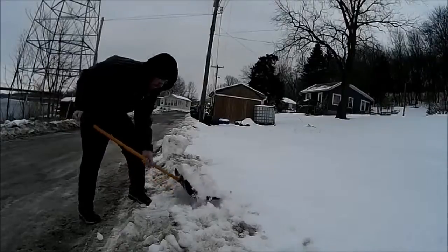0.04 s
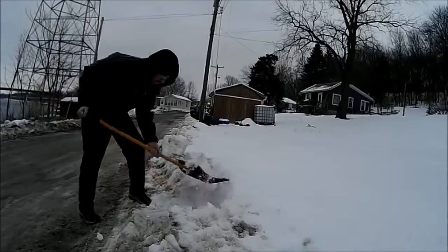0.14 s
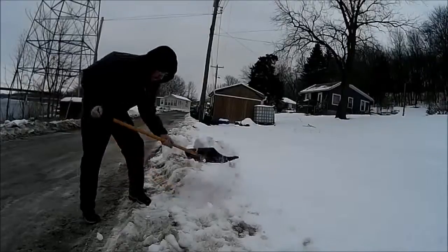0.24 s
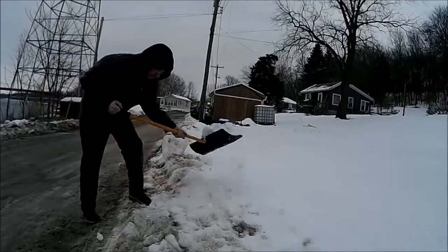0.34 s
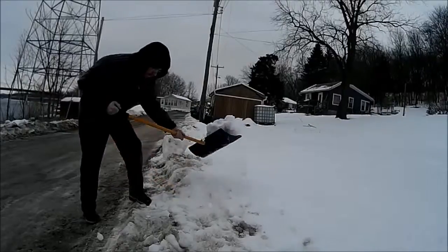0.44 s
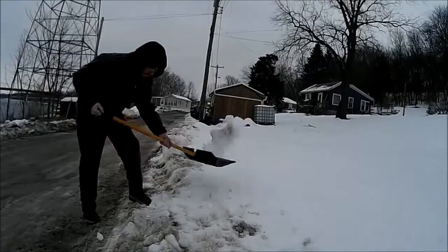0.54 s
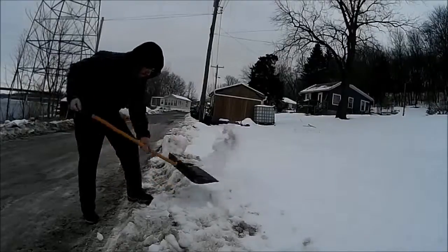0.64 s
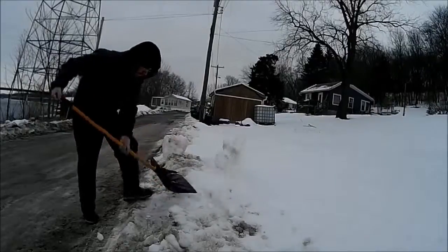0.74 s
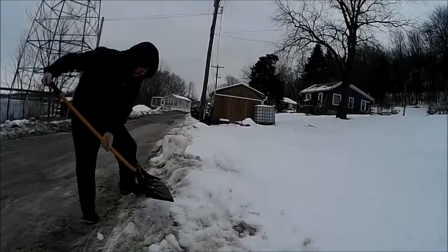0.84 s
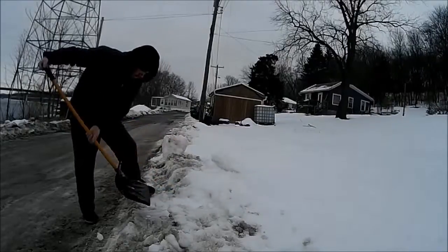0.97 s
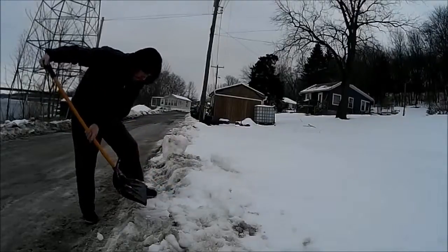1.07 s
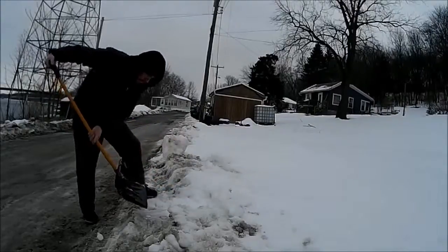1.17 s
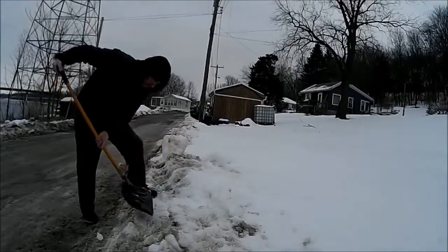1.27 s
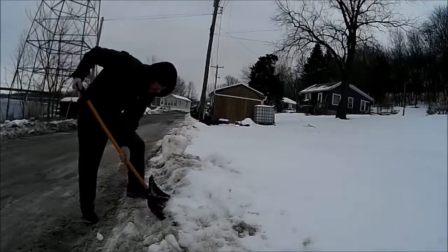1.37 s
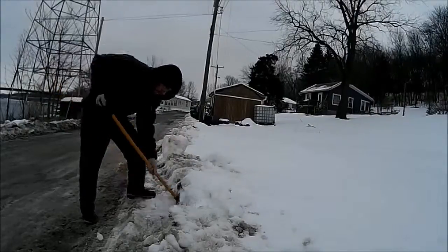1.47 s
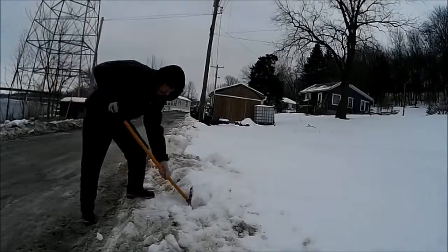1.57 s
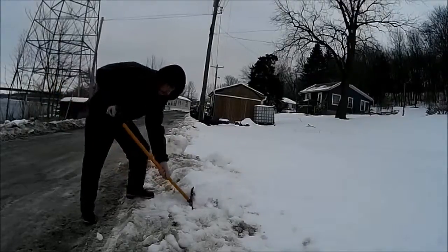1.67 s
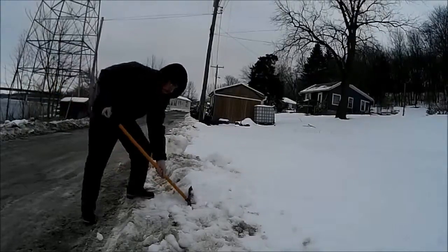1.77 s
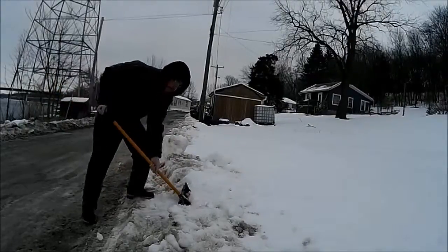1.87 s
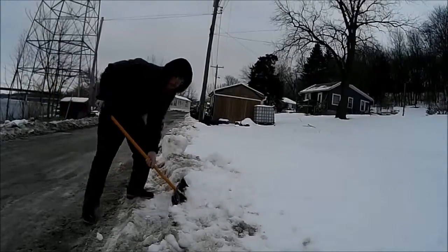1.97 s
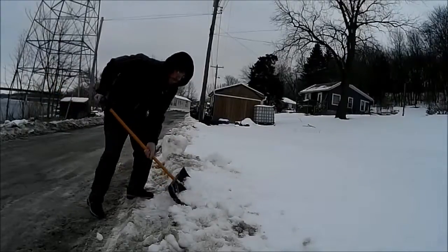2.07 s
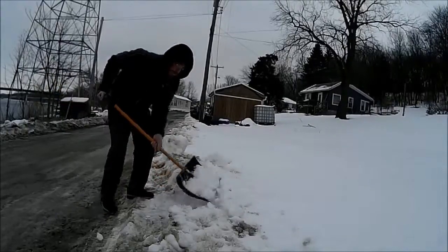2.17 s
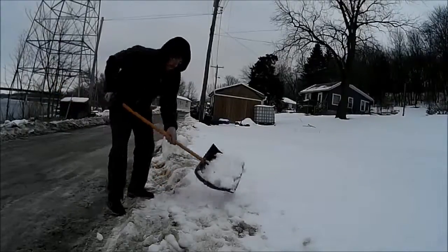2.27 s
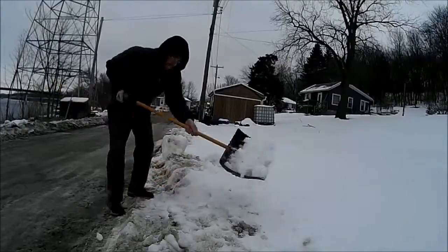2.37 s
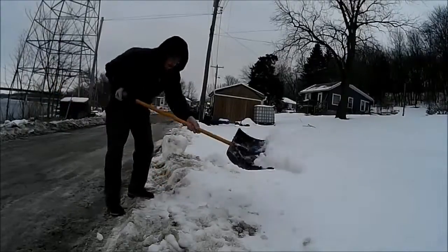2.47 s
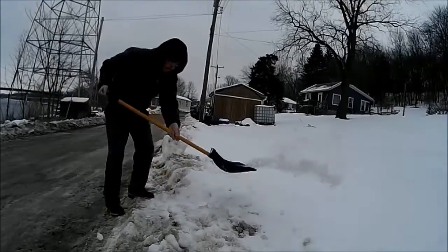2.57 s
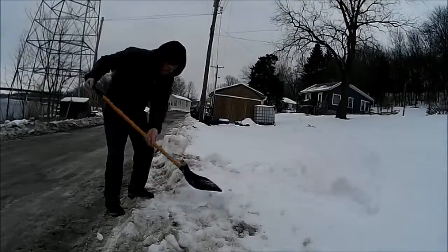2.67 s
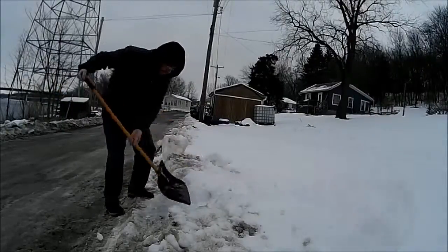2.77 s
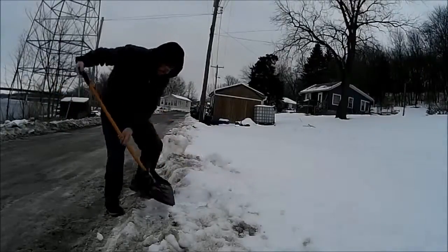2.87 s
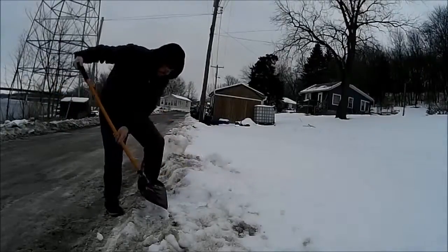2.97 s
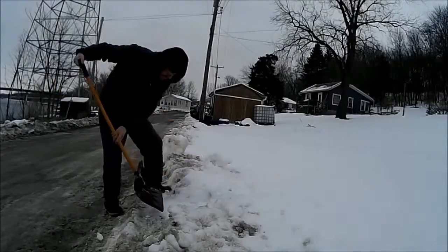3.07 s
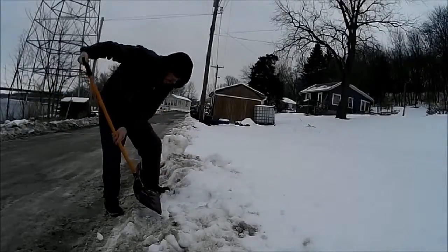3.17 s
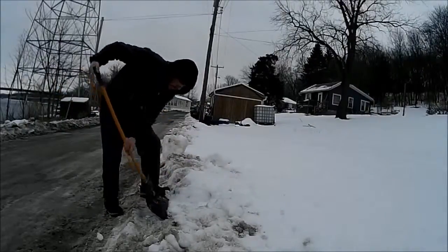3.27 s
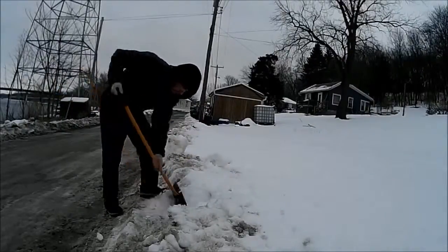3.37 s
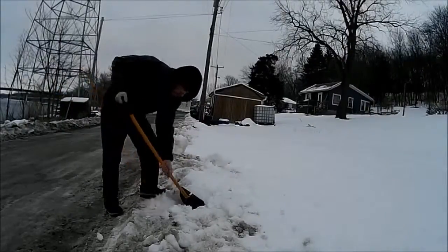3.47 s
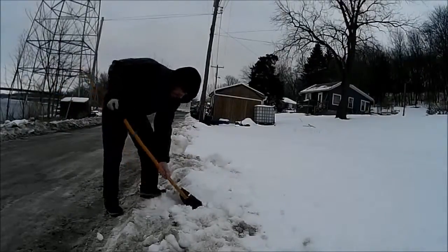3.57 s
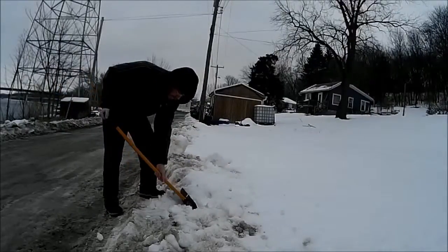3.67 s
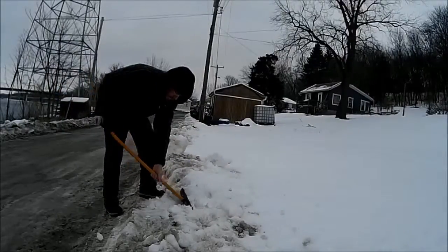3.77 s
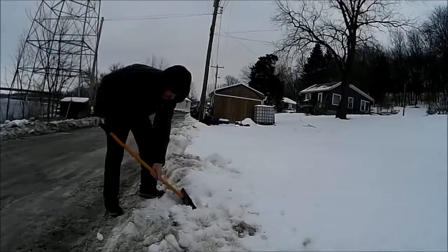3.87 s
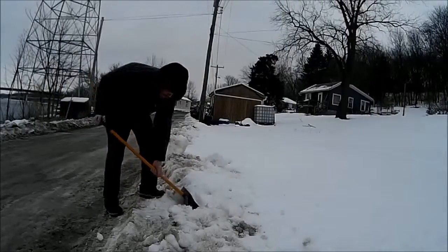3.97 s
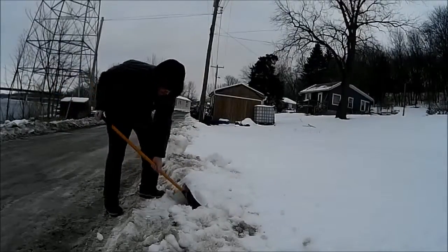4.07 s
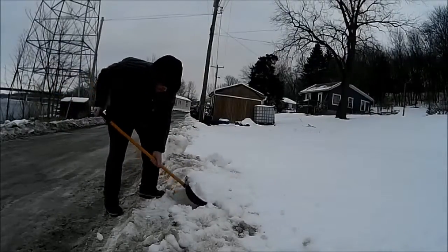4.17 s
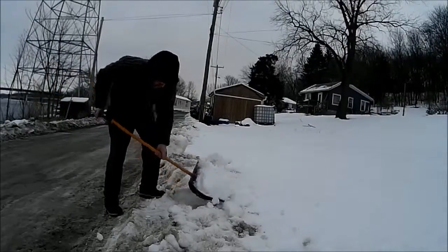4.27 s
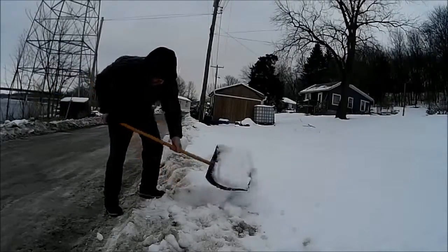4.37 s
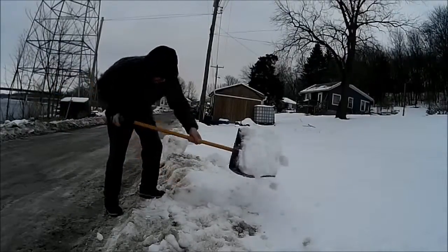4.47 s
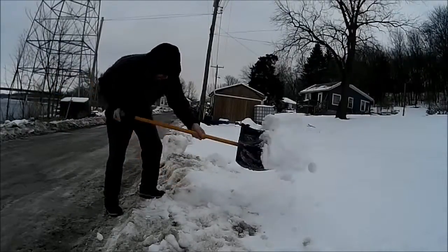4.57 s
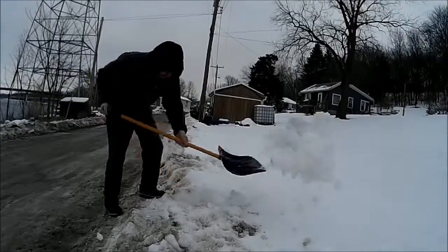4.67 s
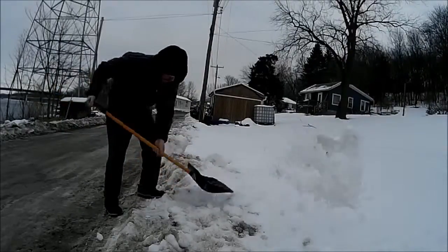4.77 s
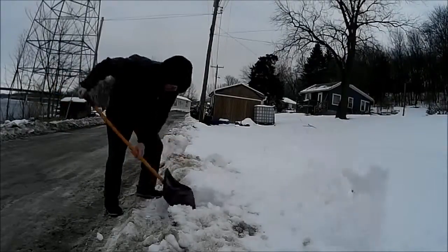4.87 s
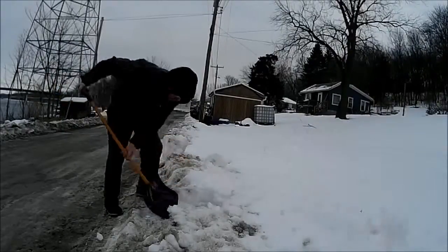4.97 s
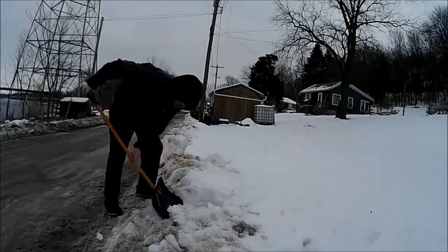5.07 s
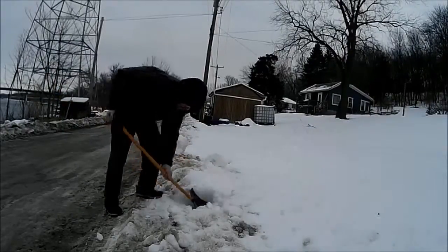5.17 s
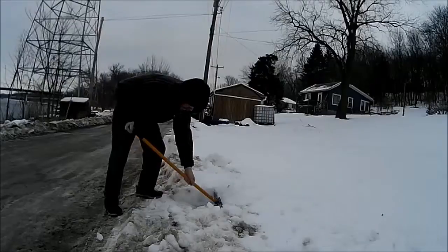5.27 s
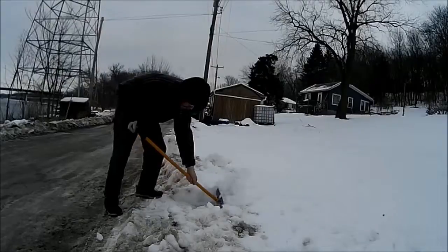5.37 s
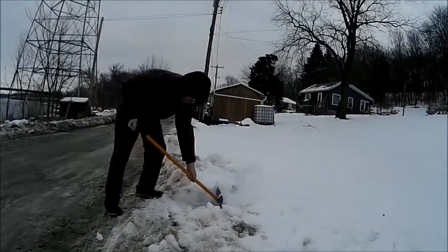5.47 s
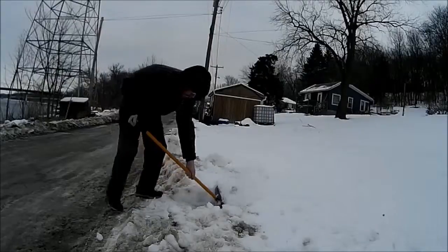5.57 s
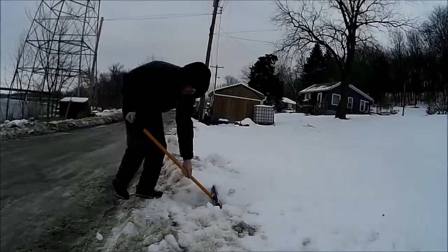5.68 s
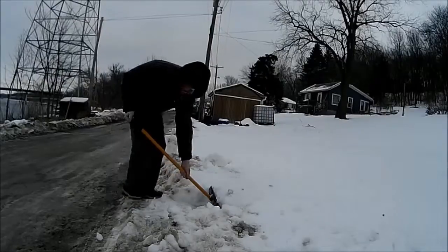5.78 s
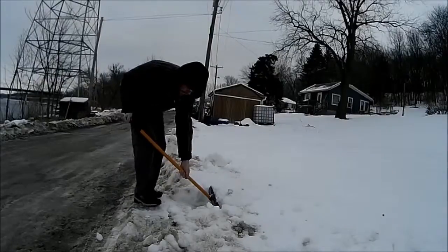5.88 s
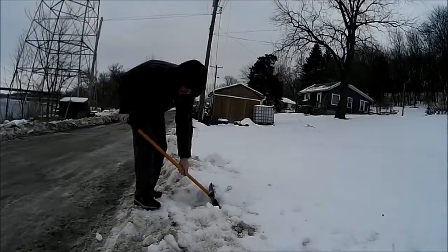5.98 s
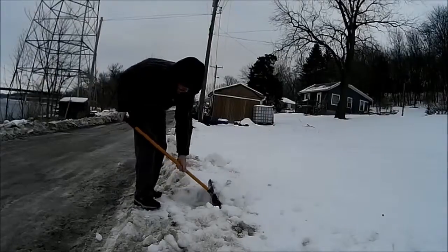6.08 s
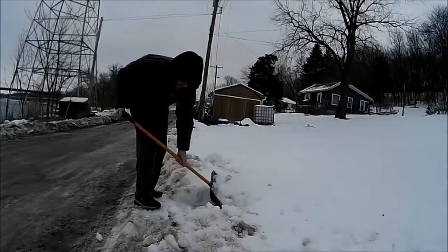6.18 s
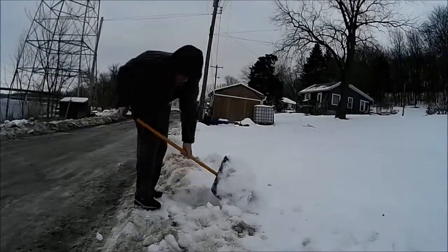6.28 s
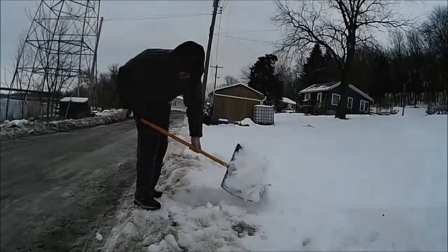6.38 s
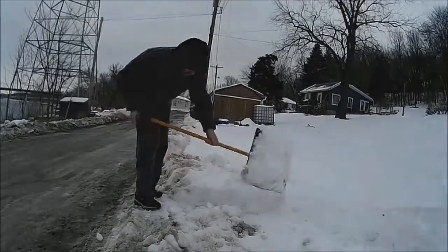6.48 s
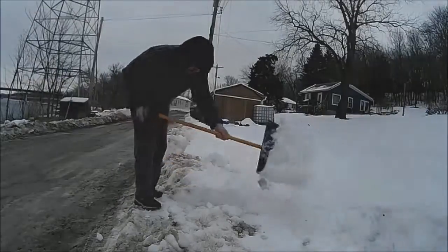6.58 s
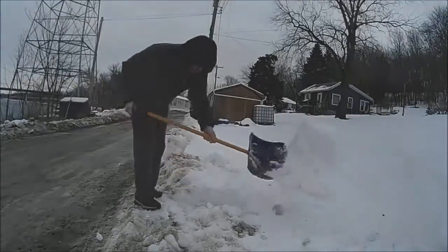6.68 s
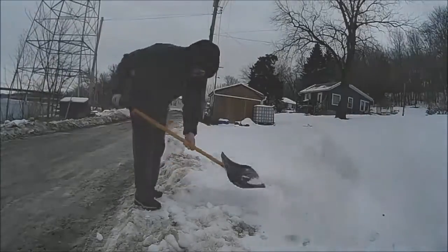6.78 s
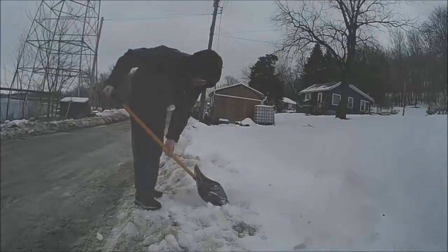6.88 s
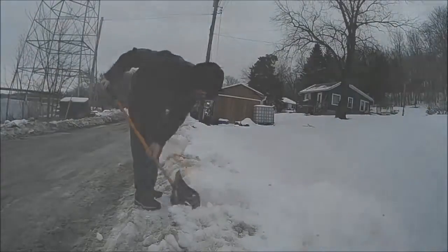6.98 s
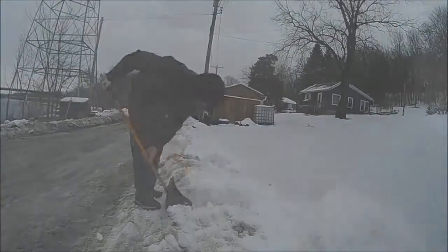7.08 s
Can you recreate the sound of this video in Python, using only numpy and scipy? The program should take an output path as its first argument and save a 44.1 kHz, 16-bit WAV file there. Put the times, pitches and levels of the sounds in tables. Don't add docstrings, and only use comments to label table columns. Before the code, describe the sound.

Over a quiet, hissy winter ambience, small lumps tick and powder hisses. Two short, crackling shovel strokes are separated by soft falling snow; a third leads straight into a sharp, metallic icy blow and skid. Then calm, before three joined scrapes erupt right beside the microphone, coarse, hollow and overloaded, with gusts rumbling until the abrupt end.

```python
import sys
import numpy as np
from scipy import signal
from scipy.io import wavfile
from scipy.ndimage import uniform_filter1d

SR = 44100
rng = np.random.default_rng(int(sys.argv[2]) if len(sys.argv) > 2 else 0)


def ratio(d):
    e = np.asarray(d, float) / 20
    return 10 ** e


def dump(signal):
    limited = np.clip(np.atleast_2d(signal).T, -1, 1)
    pcm = np.round(limited * 32767).astype(np.int16)
    wavfile.write(sys.argv[1], SR, pcm)


N = 314433
T = np.arange(N) / SR

# (centre [Hz], width [Hz], lift [dB])
FAR_RINGS = [(555, 160, 5.5), (1500, 420, 4.5), (2145, 67, 6.5), (3563, 630, 11), (3970, 180, -6.5),
             (4930, 310, -7), (5370, 310, 8), (7290, 1200, 7), (8100, 380, -7.5), (10020, 430, -9.5),
             (11130, 2300, 10), (13900, 860, -15.5), (14800, 600, -6.5)]
NEAR_RINGS = [(820, 240, 5.5), (1370, 270, 0), (2204, 82, 5), (2590, 260, 1), (3510, 770, 5),
              (4400, 220, 6.5), (5300, 220, 5), (6600, 400, 1.5), (13600, 800, -10), (14600, 700, 2)]


def evened(x):
    return x / np.sqrt(np.mean(x ** 2) + 1e-20)


def wobble(ms):
    size = max(int(ms * SR / 1000), 2)
    smooth = uniform_filter1d(rng.standard_normal(N), size)
    return evened(uniform_filter1d(smooth, size))


def grains(per_s, spread_db):
    snaps = (rng.random(N) < per_s / SR) * rng.standard_normal(N)
    size_db = spread_db * np.minimum(rng.exponential(1, N), 4)
    return evened(snaps * ratio(size_db))


def coloured(x, points, rings, lo_hz=1, hi_hz=30000):
    hz = abs(np.fft.fftfreq(8192, 1 / SR)) + 1
    f, db = np.transpose(points)
    shape_db = np.interp(np.log(hz), np.log(f), db)
    for centre, width, lift_db in rings:
        shape_db += lift_db / (1 + (2 * (hz - centre) / width) ** 2)
    edges = 1 / np.sqrt((1 + (lo_hz / hz) ** 8) * (1 + (hz / hi_hz) ** 8))
    log_gain = np.log(ratio(shape_db) * edges + 1e-6)
    phase = -signal.hilbert(log_gain).imag
    taps = np.fft.ifft(np.exp(log_gain + 1j * phase)).real[:4096]
    return signal.oaconvolve(x, taps / np.linalg.norm(taps))[:N]


def layers(crunch_db, slide_db, load_db, law):
    scoop_db, scoop_slope, grit_db, grit_slope, fizz_db = law
    flat = np.zeros(len(crunch_db))
    scoop = scoop_db + load_db + scoop_slope * (crunch_db + 38.0)
    grit = flat + grit_db + grit_slope * slide_db
    fizz = flat + fizz_db + slide_db
    return ratio(crunch_db + np.array([scoop, flat, grit, fizz])) ** 2


def move_gains(strokes, rustles, settle_db, law):
    rise_from_db, release_db_per_s = -21, 234
    settle_edge_db = -5
    power = layers(np.full(N, settle_db), settle_edge_db, 0, law)
    for s, rise, hold, db, slide_db in rustles:
        span = slice(round(s * SR), round((s + 0.8) * SR))
        t = T[span] - s
        swell_db = rise_from_db * np.maximum(1 - t / max(rise, 1e-3), 0)
        fall_db = release_db_per_s * np.maximum(t - rise - abs(hold), 0)
        power[:, span] += layers(db + swell_db - fall_db, slide_db, 0, law)
    for rows in strokes:
        s, *controls_db = np.transpose(rows)
        span = slice(int(s[0] * SR), int(s[-1] * SR))
        power[:, span] += layers(*[np.interp(T[span], s, db) for db in controls_db], law)
    return uniform_filter1d(np.sqrt(power), 40, axis=1)


def lump_gains(lumps, crunch_db, grit_db):
    size = 8000
    out, t = np.zeros((4, N + size)), np.arange(size) / SR
    onset = 1 - np.exp(-t / 0.00024)
    for s, db, bright_db, t60 in lumps:
        fall_db = -60 * t / np.clip(t60, .01, .2)
        low = db + crunch_db + fall_db
        high = db + bright_db + grit_db + 2 * fall_db
        start = round(s * SR)
        out[:, start:start + size] += ratio([low - 1.5, low, high, high - 2.5]) * onset
    return out[:, :N]


def shovel(moves, lumps, colour, rings, judder_db, lump_db):
    # (low edge [Hz], high edge [Hz])
    bands_hz = [(110, 800), (800, 2300), (2300, 6300), (6300, 30000)]
    judder = wobble(6.)
    gains = np.hypot(moves, lump_gains(lumps, lump_db - 20.0, lump_db - 8.0))
    scoop = grains(3000, 2.5) * evened(ratio(judder_db * judder + 0.49 * wobble(6.8)))
    crackle = grains(250, 1.9)
    crunch = evened(grains(8000, 0.73) + 0.074 * crackle)
    crunch = crunch * evened(ratio(judder_db * judder + 1.2 * wobble(36.0)))
    grit = grains(16000, 3.5) * evened(ratio(0.57 * judder_db * judder + 1.3 * wobble(15.0)))
    fizz = grains(24000, 1.0) * evened(ratio(1.2 * judder_db * judder + 0.67 * wobble(17.0)))
    sources = (scoop, crunch, grit, fizz)
    return sum(coloured(g * x, colour, rings, *band) for g, x, band in zip(gains, sources, bands_hz))


def far_shovel():
    # (time [s], pressure as crunch [dB], edge slide [dB], scoop load [dB])
    strokes = [
        [(1.3642, -41, 0, 3), (1.367, -37.5, 3.5, 4), (1.435, -27.5, 7, 5.5), (1.475, -27.5, 2, 5),
         (1.52, -26, 1, 4), (1.558, -28, 3, -2), (1.575, -23.5, -0.5, 5), (1.62, -24.5, -7, -12),
         (1.668, -28.5, -5, -2), (1.684, -57, 1, -5)],
        [(3.286, -40, -1, -6), (3.297, -35, 6, 0), (3.321, -29, 5, 6), (3.4, -23.5, 1.5, 3),
         (3.415, -16.5, 3, 5.5), (3.44, -20.5, 4, 1.5), (3.492, -19.5, 5, -1), (3.525, -26.5, 2.5, -1),
         (3.536, -42, -2, -7), (3.555, -48, -5, 0)],
        [(4.94, -63, 6, -6), (4.96, -53.5, 10, 8), (4.995, -48, 3, 4), (5.04, -38.5, -1, -3),
         (5.069, -35, -4.5, -10), (5.125, -38, 0.5, -3), (5.16, -28, 6.5, -6.5), (5.18, -28, -2.5, 3)],
    ]
    chop = [
        (5.18, -28, 3, 3),
        (5.19, -23, 5, 8.5),
        (5.222, -13, -0.5, 3),
        (5.274, -23.5, -1.5, 4.5),
        (5.28, -17.5, -4.5, 1),
        (5.316, -34, 4, -1),
        (5.36, -40, -2, 2),
        (5.39, -55, 1, -9.5),
    ]
    # (start [s], rise [s], hold [s], crunch [dB], edge slide [dB])
    rustles = [(0.0, 0.0013, 0.0018, -57, 5), (0.402, 0.023, 0.0011, -57, 0),
               (0.624, 0.027, 0.28, -64.5, 0), (0.675, 0.058, 0.11, -58, -9), (1.668, .01, 0.056, -54, 0),
               (1.767, 0.073, 0.16, -51.5, -3.5), (2.037, 0.04, .01, -47, -2.5),
               (2.108, 0.036, 0.21, -57, -3.5), (2.18, .01, 0.026, -63, 10.5),
               (2.411, 0.006, 0.12, -50.5, -5), (2.653, 0.0083, 0.021, -71, 7),
               (2.847, 0.018, 0.052, -55.5, 5), (2.965, 0.032, 0.08, -60.5, -1),
               (3.12, 0.026, 0.038, -64, -8), (3.552, 0.0084, 0.029, -43, 1),
               (3.65, 0.012, 0.033, -40, 2.5), (3.721, .006, 0.018, -51, 6.5),
               (3.846, 0.0051, 0.0092, -52, -7), (3.904, 0.034, 0.021, -60, 6.5),
               (4.074, 0.22, .001, -48.5, 1.5), (4.247, 0.014, 0.0026, -39, -1),
               (4.38, 0.022, 0.068, -78, 18), (4.494, 0.017, 0.041, -56.5, -1.5),
               (4.555, 0.078, .005, -49.5, -2), (4.683, 0.034, 0.13, -70, -4),
               (5.378, .011, 0.018, -54, -2), (5.49, 0.15, 0.11, -62, 1), (5.907, 0.011, 0.32, -60, 0),
               (6.1, 0.1, 0.15, -60.5, 1)]
    # (time [s], peak [dB], brightness [dB], t60 [s])
    lumps = [(1.383, -8.5, -23, 0.054), (1.418, -11, -11, 0.05), (1.568, -10, -12, 0.13),
             (2.493, -16, -23, 0.18), (3.293, -34, -13, 0.036), (3.314, -24, -4, 0.033),
             (3.409, -5, -19, 0.05), (3.564, -28, -10, 0.03), (3.622, -19.5, -14, 0.083),
             (3.667, -12.5, -21, 0.02), (3.732, -20, -9, 0.081), (4.256, -22, -19, 0.03),
             (4.271, -10, -16, 0.12), (4.298, -10, -15, 0.018), (4.997, -10, -15.5, 0.054),
             (5.015, -20, -16, .04), (5.199, -6, -18, .03), (5.155, -24, 3, 0.035),
             (5.181, -20.5, -3, 0.03), (5.188, -7, -23, 0.049), (5.21, 12, -27, 0.028),
             (5.332, -24, -17, 0.04)]
    # (frequency [Hz], density [dB per Hz])
    colour = [(35, -62), (60, -10.5), (215, -4.5), (350, -3), (479, 1.5), (763, 1.5), (1570, -1.5),
              (2340, -11), (3560, -16), (4000, -21), (5420, -16.5), (8240, -23), (11200, -28), (15250, -22),
              (15800, -40)]
    # (scoop at reference crunch [dB], scoop slope [dB per crunch dB],
    # grit [dB], grit slope [dB per slide dB], fizz [dB])
    law = (-5, -0.2635, -7.5, 0.75, -10)
    moves = move_gains(strokes + [chop], rustles, -70.5, law)
    return shovel(moves, lumps, colour, FAR_RINGS, judder_db=0.57, lump_db=-4.5)


def near_shovel():
    # (time [s], pressure as crunch [dB], edge slide [dB], scoop load [dB])
    strokes = [
        [(6.318, -10.5, -7.5, -4), (6.33, -16.5, 3.5, -7), (6.353, -9, 2, -0.5), (6.375, -11.5, 0, -5.5),
         (6.392, -18, -4, -5), (6.4, -13, -0.5, -11), (6.44, -19.5, 4.5, -3)],
        [(6.44, -22, 11, -2), (6.446, -13, 8, -1.5), (6.538, -18.5, 4.5, -3), (6.618, -17, 4, -0.5),
         (6.674, -10.5, -0.5, 2), (6.71, -24, 1.5, 1), (6.722, -23, -4, 10), (6.778, -39, 1, -1),
         (6.785, -30, 0, -9)],
        [(6.787, -22.5, -12, -8), (6.803, -31, -3, 9.5), (6.828, -23.5, -2, 2), (6.841, -17.5, -0.5, -3.5),
         (6.863, -20, 5, 10), (6.9, -15, 1.5, 1.5), (6.933, -12.5, -2.5, -0.5), (6.98, -7.5, -5.5, -6),
         (6.992, -13, -4, 2.5), (7.03, -17.5, -3, 3), (7.09, -15, -3, -1), (7.118, -19, -1, 4)],
    ]
    # (time [s], peak [dB], brightness [dB], t60 [s])
    lumps = [(6.318, -12, -16.5, 0.04), (6.339, 6, -11, 0.046), (6.398, -25.5, 10, 0.04),
             (6.446, -10.5, -9, 0.04), (6.651, 12, -13, 0.022), (6.723, 6.5, -25, 0.055),
             (6.785, -4, -11, 0.029), (6.813, -1, -21, 0.043), (6.834, 1, -14, 0.04),
             (6.869, -4, -21, 0.044), (6.918, 9.5, -19, 0.036), (6.935, 12.5, -25, 0.072),
             (6.976, 8.5, -9, 0.07), (7.085, 0, -8, 0.04), (7.121, 11, -18, 0.099)]
    # (frequency [Hz], density [dB per Hz])
    colour = [(24, -49.5), (40, -6), (120, -16.5), (255, -12.5), (442, -2), (1060, -3), (1360, 2.5),
              (2360, -6.5), (2680, -1), (3110, -13.5), (3620, -8), (5820, -25), (12500, -34), (15200, -36),
              (15800, -35)]
    # (scoop at reference crunch [dB], scoop slope [dB per crunch dB],
    # grit [dB], grit slope [dB per slide dB], fizz [dB])
    law = (-0.5, -0.0766, -5, 0.32, -9)
    moves = move_gains(strokes, [], -120., law)
    return shovel(moves, lumps, colour, NEAR_RINGS, judder_db=0.25, lump_db=0.5)


def flexing(x, depth_db):
    flex_hz, flex_s = 400., 0.026
    z = signal.stft(x, nperseg=128, noverlap=96)[2]
    wide, long = max(int(flex_hz * 128 / SR), 1), max(int(flex_s * SR / 32), 1)
    patches = rng.standard_normal(z.shape[::-1]).T
    for _ in range(2):
        patches = uniform_filter1d(patches, wide, axis=0)
        patches = uniform_filter1d(patches, long, axis=1)
    gain = evened(ratio(depth_db * evened(patches)))
    return signal.istft(z * gain, nperseg=128, noverlap=96)[1][:N]


def knocks():
    # (time [s], peak [dB], pitch [Hz], t60 [s])
    hard = [(1.424, -13.5, 552, 0.035), (1.444, -11, 1340, 0.012), (1.44, -18, 1470, 0.038),
            (1.657, -19, 1500, .03), (1.526, -11, 525, 0.016), (1.523, -21, 1500, .015),
            (4.268, -25.5, 240, 0.051), (1.571, -17, 1400, 0.017), (1.586, -20, 1060, .02),
            (1.622, -17, 540, 0.021), (3.32, -16, 1600, 0.017), (3.471, -11, 1800, 0.016),
            (3.505, -12, 530, 0.017), (3.732, -31.5, 1030, .02), (5.04, -25, 1580, .015),
            (5.073, -23, 1200, 0.018), (5.155, -16, 1600, 0.019), (5.18, -10, 1550, 0.015),
            (6.447, -4, 760, 0.019), (5.169, -14, 1400, .012), (5.333, -23, 980, 0.017),
            (5.4, -24, 970, 0.02), (6.413, -6, 640, 0.031), (6.361, -5, 850, .05), (6.466, 1, 1760, 0.015),
            (6.623, -4, 1440, 0.019), (6.684, -10, 600, 0.019), (6.816, -11, 1350, 0.016),
            (7.089, -4, 1030, 0.025), (1.463, -11.5, 540, 0.029), (1.582, -17, 1560, .035),
            (1.549, -11.5, 490, 0.017), (1.497, -10.5, 490, 0.014), (2.498, -32, 1350, 0.029),
            (3.4084, -10.5, 490, 0.037), (3.685, -27, 700, 0.018), (3.66, -22, 190, 0.019),
            (2.08, -32.5, 350, 0.022), (2.5, -42, 280, 0.024), (3.43, -19.5, 200, 0.066),
            (3.6, -32.5, 210, 0.043), (5.21, -17, 330, 0.05), (6.87, -8.5, 395, 0.065),
            (6.787, -23, 2700, .01), (4.275, -13.5, 500, 0.01), (4.297, -25, 1570, 0.017),
            (5.02, -22, 1230, 0.02), (5.089, -22, 1140, 0.023), (5.214, -8, 460, 0.03),
            (5.225, -6, 1150, .03), (5.245, -8, 1100, .025), (5.26, -5.5, 1490, 0.014),
            (6.443, -2, 1650, 0.012), (6.724, -27, 960, 0.015), (6.833, -1, 1320, 0.013)]
    # (time [s], peak [dB], pitch [Hz])
    pats = [(0.029, -42, 555), (0.201, -34.5, 610), (0.644, -36, 770), (0.681, -38, 1020),
            (0.738, -37, 1230), (0.785, -36.5, 1010), (0.81, -32.5, 1060), (1.006, -39, 890),
            (1.032, -40, 1090), (1.1, -41, 1100), (0.697, -38, 1040), (1.323, -42, 844), (1.963, -32, 590),
            (2.08, -31, 1400), (2.093, -31, 1300), (2.298, -35, 895), (2.729, -35.5, 700),
            (1.847, -41, 559.6), (1.861, -37, 1030), (1.892, -41, 1050), (1.93, -39, 1600),
            (2.053, -38, 560), (2.26, -35, 700), (2.423, -34.5, 1440), (2.43, -35, 650), (2.473, -32, 1450),
            (2.505, -35, 560), (2.866, -37, 800), (3.736, -28, 540), (3.563, -32, 1500), (3.663, -31, 1520),
            (3.664, -26, 3360), (3.697, -40, 2200), (4.996, -22, 820), (5.015, -23.5, 820),
            (4.27, -26, 2060), (2.881, -36, 805), (2.934, -29.5, 600), (3.078, -35.5, 850),
            (3.779, -28, 536.4), (4.231, -33, 1500)]
    pat_t60_s, rise_s, size = .013, 0.00093, 3000
    out, t = np.zeros(N + size), np.arange(size) / SR
    for s, db, hz, t60 in hard + [(*pat, pat_t60_s) for pat in pats]:
        overtone = 0.29 * np.sin(2 * np.pi * 3.2 * hz * t) * ratio(-60 * t / 0.0081)
        ring = np.sin(2 * np.pi * hz * t) + overtone
        decay = ratio(-60 * t / np.clip(t60, .006, .05)) * np.minimum(t / rise_s, 1)
        start = round(s * SR)
        out[start:start + size] += ratio(db) * ring * decay
    high_pass = signal.butter(2, 220, "high", fs=SR, output="sos")
    return signal.sosfilt(high_pass, out[:N])


def ticks(table, rings):
    size = 1200
    out, t = np.zeros(N + size), np.arange(size) / SR
    for (s, db, hz, t60), noise in zip(table, rng.standard_normal((len(table), size))):
        band = signal.butter(1, [hz / 1.6, min(hz * 1.6, 20000)], "band", fs=SR, output="sos")
        decay = ratio(db - 60 * t / np.clip(t60, .003, .05)) * np.minimum(t / 0.00069, 1)
        start = round(s * SR)
        out[start:start + size] += decay * signal.sosfilt(band, noise)
    return coloured(out[:N], [(800, -46.0), (3000, 7.0), (16000, 1.0)], rings)


def cracking_ice():
    # (time [s], peak [dB], centre [Hz], t60 [s])
    far = [(.011, -39, 8900, 0.0089), (.0707, -43, 10000, 0.0084), (.432, -54, 9000, .007),
           (.464, -54, 9000, .007), (.533, -47, 9000, .007), (.561, -48, 8990, .007),
           (1.383, -21, 9000, 0.0086), (1.417, -14, 8100, 0.013), (1.527, -26, 9000, .008),
           (1.588, -31, 9000, .008), (1.714, -45, 9000, .007), (1.95, -44, 5400, 0.033),
           (2.078, -40, 5000, .01), (2.157, -44, 8000, .007), (2.257, -43, 7000, 0.027),
           (2.298, -47, 8000, .007), (2.533, -41, 10500, 0.0087), (3.295, -25, 11500, .012),
           (3.314, -17, 9050, 0.013), (3.487, -16, 4000, .008), (3.542, -45, 12000, .006),
           (3.582, -35, 4500, .01), (3.69, -33, 3600, 0.03), (3.739, -33, 8000, .008),
           (3.857, -51, 6000, .04), (3.943, -44, 8000, .008), (4.14, -43, 4000, 0.0088),
           (4.215, -45, 4000, .01), (4.295, -35, 12000, .01), (4.351, -43.5, 7000, .02),
           (4.424, -52, 7500, .02), (4.453, -49, 7500, .015), (4.655, -42, 9000, 0.042),
           (4.679, -45, 10000, .008), (4.744, -49, 10500, .02), (4.796, -47, 9000, .007),
           (4.832, -47, 7000, .008), (4.945, -53, 9000, .008), (4.989, -33, 9000, 0.011),
           (4.995, -32, 8000, .01), (5.017, -32, 10000, 0.013), (5.052, -27, 9000, .008),
           (5.0737, -14, 8900, 0.007), (5.122, -25, 11000, .015), (5.133, -25, 4000, 0.0068),
           (5.248, -22, 6500, .008)]
    near = [(6.318, -13, 4000, 0.0069), (6.356, -6, 3500, 0.0093), (6.488, -6, 3500, 0.014),
            (6.509, -12, 3800, .01), (6.672, 0, 7900, 0.007), (6.786, -25, 5000, 0.016),
            (6.811, -22, 11000, .012), (6.928, -9, 11000, .01), (6.953, -6, 11000, .012),
            (6.984, -22, 13000, .008), (7.02, -14, 12800, .01), (7.1224, -7, 7000, 0.01)]
    return ticks(far, FAR_RINGS) + ticks(near, NEAR_RINGS)


def powder():
    # (start [s], rise [s], hold [s], level [dB rms])
    slides = [
        (0.633, .004, .07, -69),
        (0.717, .006, .05, -62),
        (0.79, .004, 0.055, -60.5),
        (0.872, .01, 0.051, -67),
        (2.842, .01, .075, -53.5),
        (2.994, .01, 0.079, -64),
        (1.836, 0.023, 0.2, -64),
    ]
    # (frequency [Hz], density [dB per Hz])
    colour = [(700, -9), (2500, -8), (4500, 1), (9000, -3), (13000, -2), (15800, 2.5)]
    gain = np.zeros(N)
    for s, rise, hold, db in slides:
        t = T - s
        fall_db = 310 * np.maximum(t - rise - hold, 0)
        gain += ratio(db - fall_db) * np.clip(t / max(rise, 1e-3), 0, 1)
    light = [(hz, width, 0.49 * lift_db) for hz, width, lift_db in FAR_RINGS]
    hiss = grains(14000, 2.5) * evened(ratio(1.5 * wobble(6.1)))
    return coloured(gain * hiss, colour, light)


def wind():
    # (time [s], peak [dB])
    peaks = [(1.49, -59), (1.98, -62), (3.43, -54), (4.71, -57), (5.22, -68), (6.1, -50), (6.2, -51),
             (6.35, -45.5), (6.5, -42), (6.65, -45), (6.95, -38.5), (7.13, -34.5)]
    calm_db, gust_db_per_s = -64.5, 65
    level_db = np.max([db - gust_db_per_s * abs(T - s) for s, db in peaks], axis=0).clip(calm_db)
    gusts = ratio(level_db) * evened(ratio(1.5 * wobble(60.)))
    colour = [(10, -26.0), (25, -13.0), (50, -0.5), (100, -11), (200, -14.5), (16000, -99.5)]
    return coloured(gusts * rng.standard_normal(N), colour, [])


def winter_hum():
    # (frequency [Hz], density [dB per Hz])
    colour = [(12, -14), (20, 3), (55, -8), (107, 0.5), (215, 3), (330, -5), (510, -5), (892, -3.5),
              (998, -1.5), (2510, -19.5), (3410, -21.5), (4900, -23), (12300, -21.5), (14600, -23),
              (15900, -28)]
    # (centre [Hz], width [Hz], lift [dB])
    rings = [(216.6, 56, 0), (580, 60, 1), (1400, 330, 2), (1740, 600, -13.5), (8600, 250, 2)]
    # (frequency [Hz], level [dB rms])
    lines = [(238, -68.5), (578, -70.5)]
    drone = np.zeros(N)
    for hz, db in lines:
        level = ratio(db + 2.0 + 2.8 * wobble(90.))
        drone += level * np.sin(2 * np.pi * hz * T + 0.37 * wobble(180.0))
    level = ratio(-58 + 0.72 * wobble(150.))
    return drone + level * coloured(rng.standard_normal(N), colour, rings)


def scene():
    shovelling = flexing(far_shovel() + near_shovel(), depth_db=2.1)
    events = knocks() + cracking_ice() + powder()
    return (shovelling + events + wind() + winter_hum())[None]


def roll_off(x):
    return signal.sosfilt(signal.butter(12, 15990, fs=SR, output="sos"), x)


def record(dry):
    overloaded = np.clip(dry, -.93, .93)
    band_limit = signal.firwin(601, 15680, window=("kaiser", 6), fs=SR)
    mix = signal.oaconvolve(overloaded, band_limit[None], "same")
    return roll_off(mix)


dry = scene()
out = record(dry)
dump(out)
```